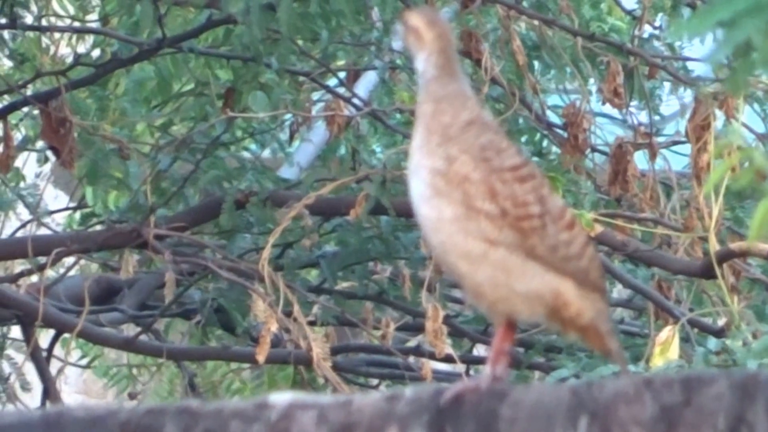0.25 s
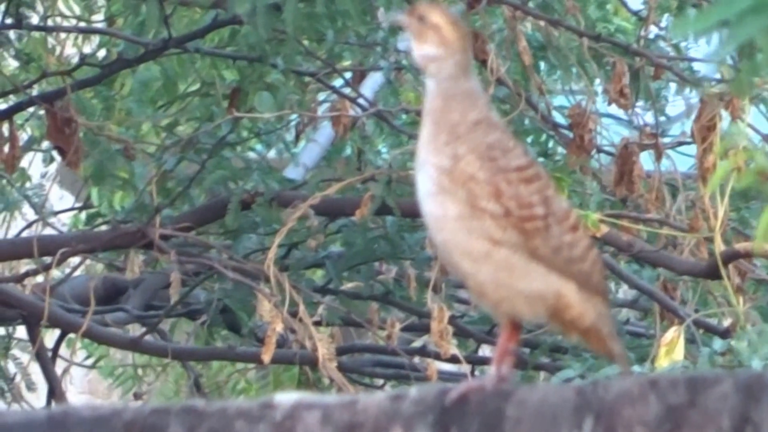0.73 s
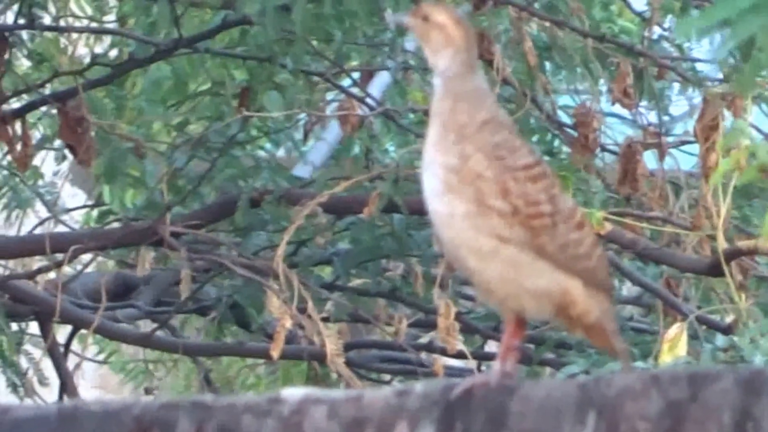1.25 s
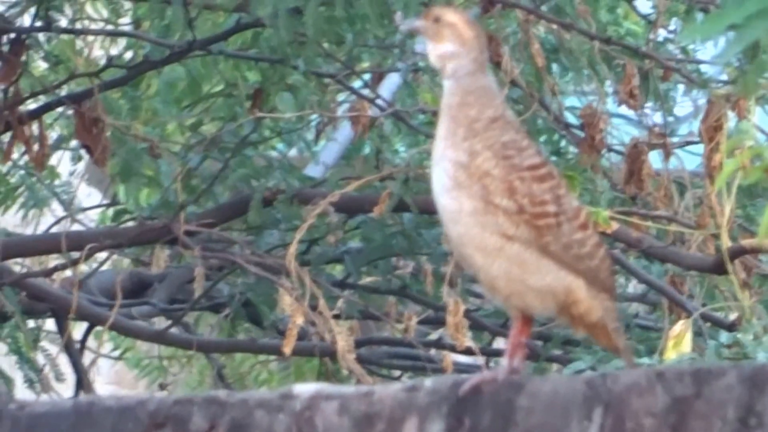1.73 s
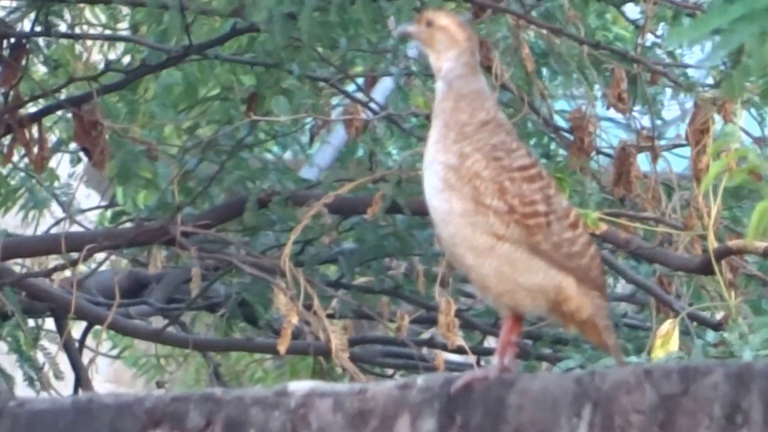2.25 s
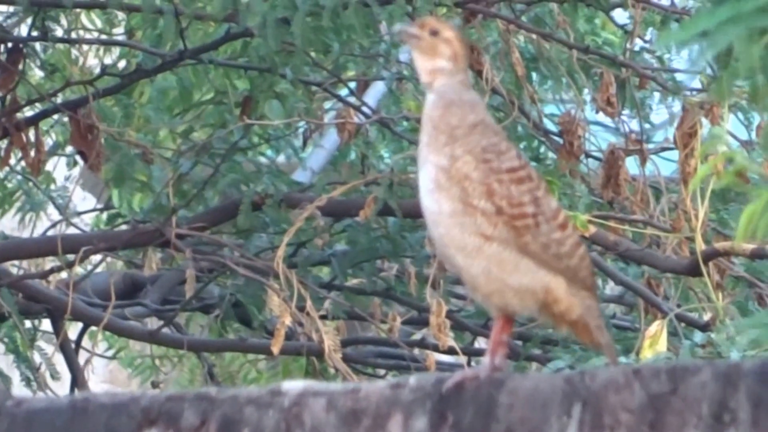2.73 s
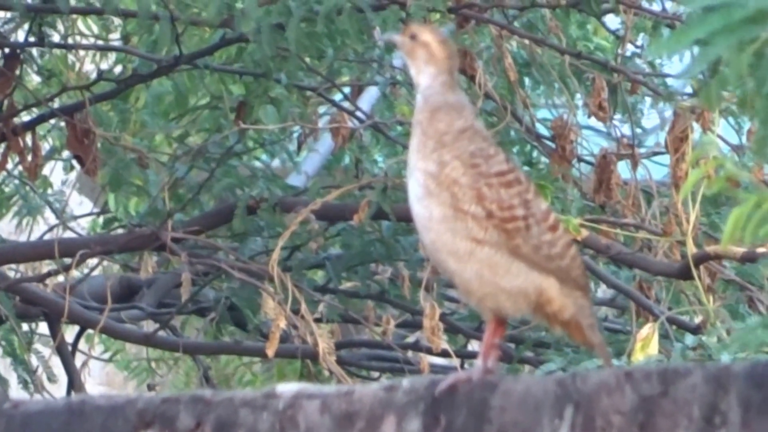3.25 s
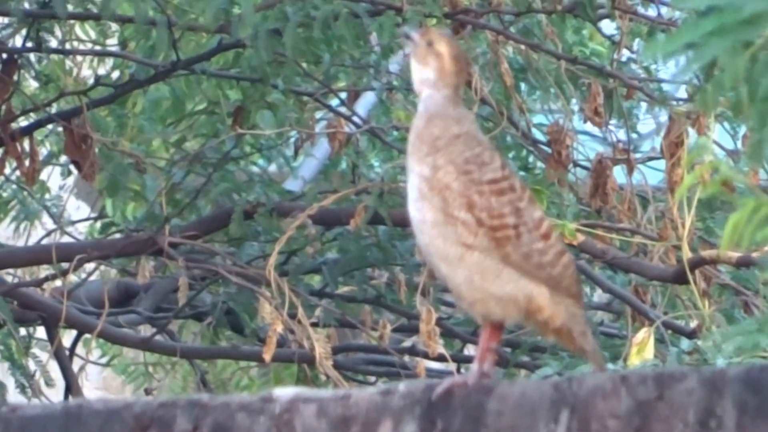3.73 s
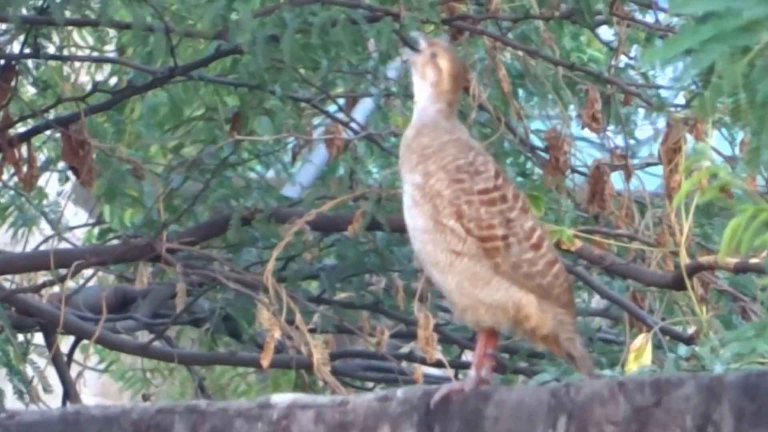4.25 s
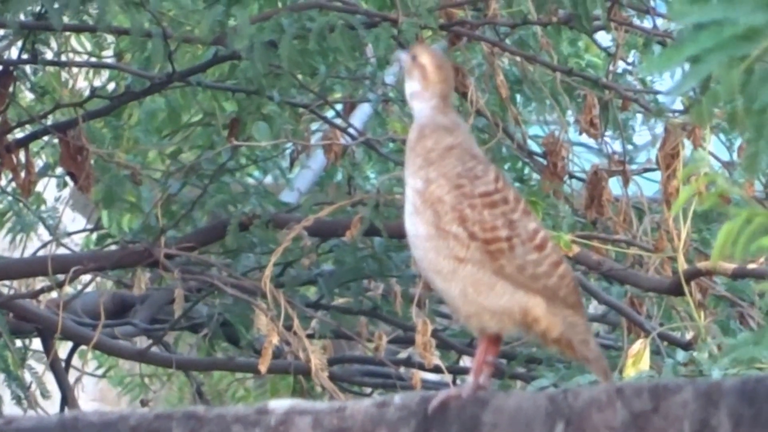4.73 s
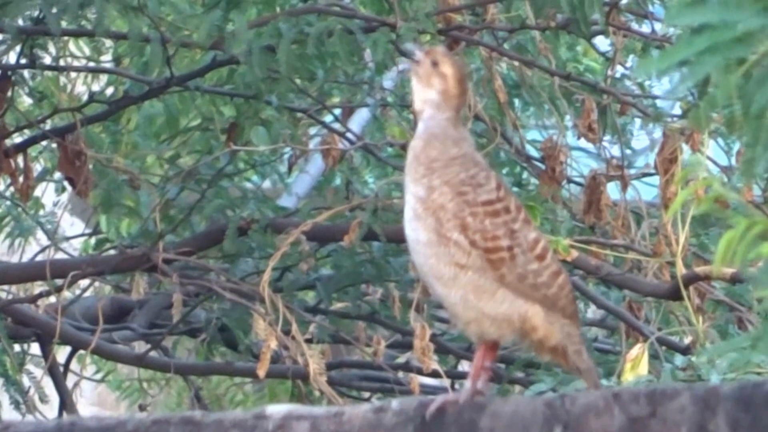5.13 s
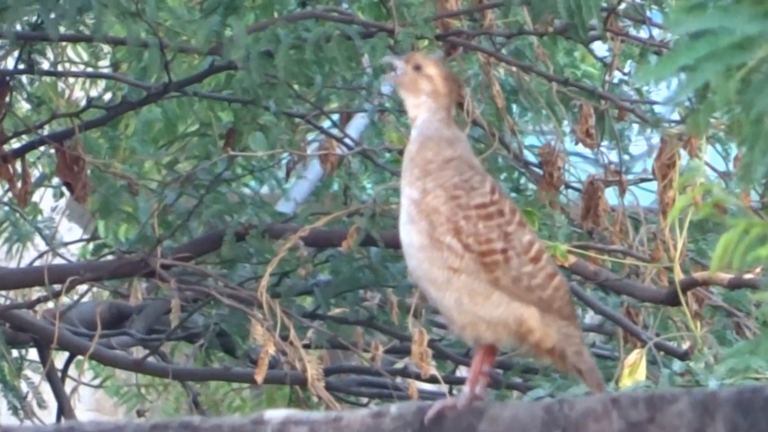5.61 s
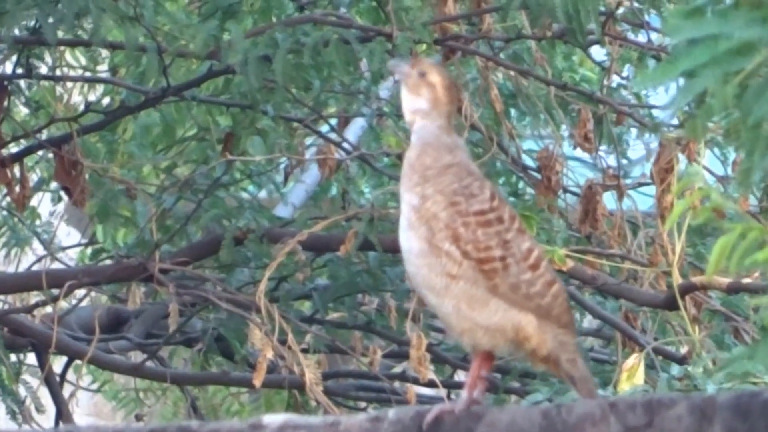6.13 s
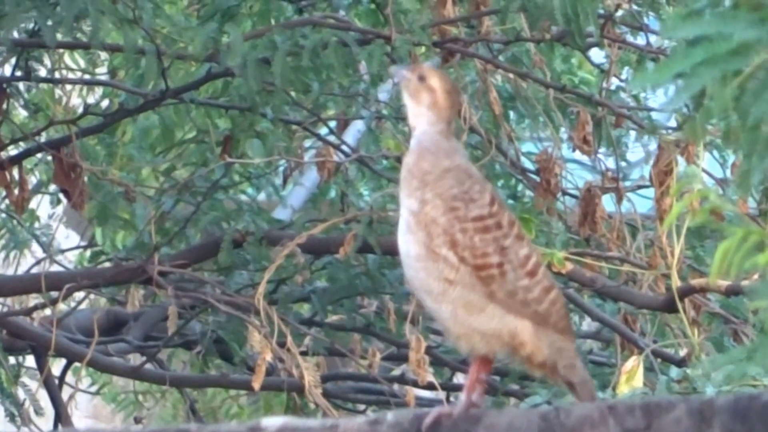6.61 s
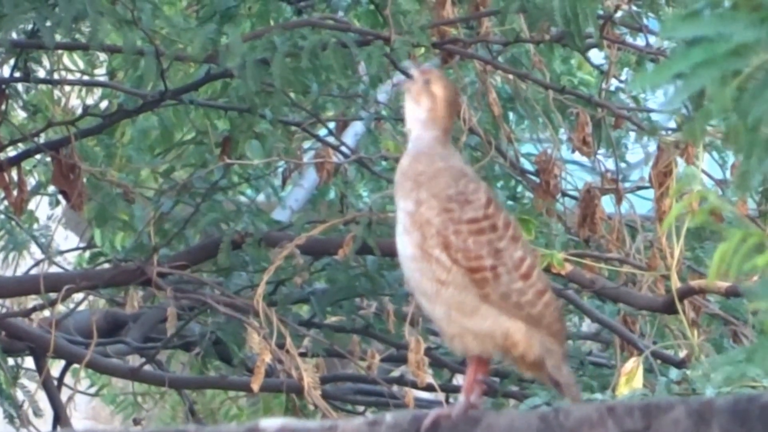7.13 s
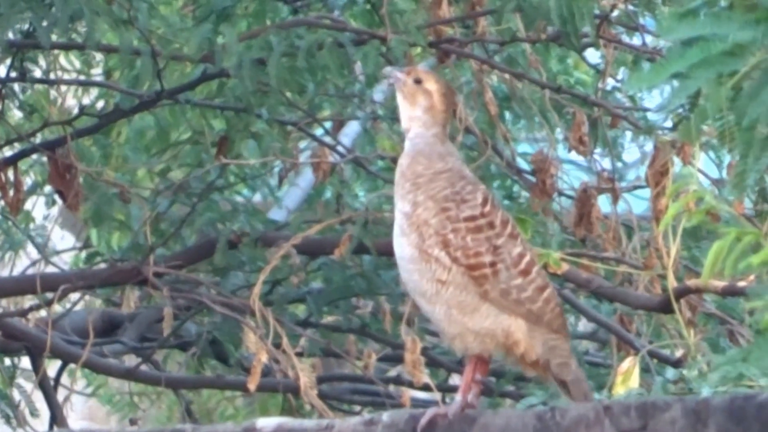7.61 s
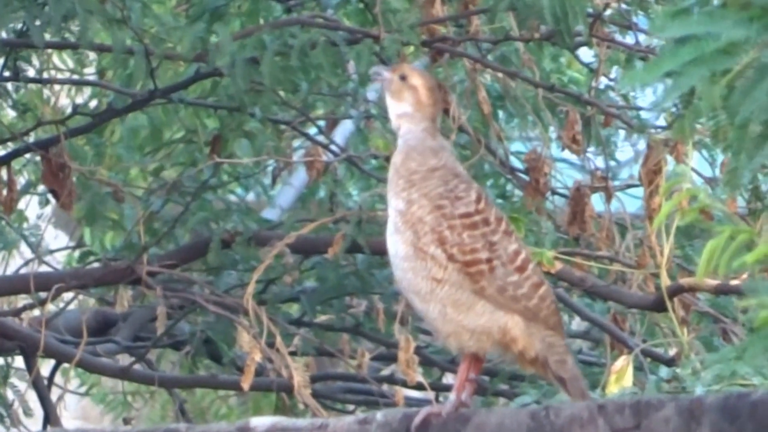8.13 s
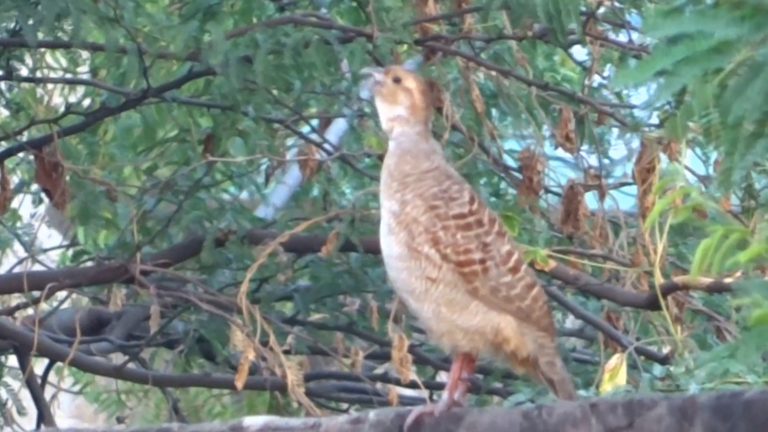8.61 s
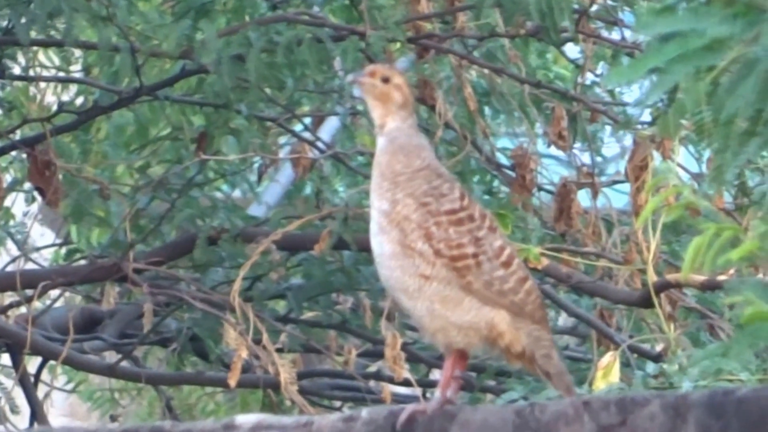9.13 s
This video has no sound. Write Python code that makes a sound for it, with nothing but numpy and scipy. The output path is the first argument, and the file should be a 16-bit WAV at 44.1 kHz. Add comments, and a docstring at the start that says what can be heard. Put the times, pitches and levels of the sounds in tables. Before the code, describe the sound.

Low town rumble and light airy hiss lie under a close francolin, heard slightly left of centre. Isolated squeals and clucks lead to soft nasal mews, then sharp, rough-edged double cries with falling ends, spaced at first and later about twice a second. Brief echoes and a leafy garden ring follow. Thin bird chips, a distant shrill trill and faint yaps appear behind; a motor swells late.

```python
"""The low rumble of a town comes first, then the squeals of a grey francolin close by on a garden wall. It
warms up with clucks while a second bird farther off answers in mews, then repeats a loud, piercing two-part
call from pulses and throat tones. The bird sits slightly left of centre; delayed copies and decaying noise make
the walls and trees answer. Small birds chip in thin sweeps; a trill and a yapping dog arrive from far off only
as garden scatter. A motor, an uneven low note over filtered noise, draws nearer towards the end."""
import sys
import numpy as np
from scipy import signal
from scipy.fft import rfft, irfft, next_fast_len
from scipy.io import wavfile
from scipy.ndimage import uniform_filter1d, minimum_filter1d

SR = 44100
rng = np.random.default_rng(int(sys.argv[2]) if len(sys.argv) > 2 else 0)


def unload_wav(signal):
    """Save mono or channel-first audio to the path in sys.argv[1] as 16-bit WAV at rate SR, clipped to [-1, 1]."""
    wavfile.write(
        sys.argv[1],
        SR,
        np.round(np.clip(np.atleast_2d(signal).T, -1, 1) * 32767).astype(np.int16),
    )


N = 412776
TIME = np.arange(N) / SR
CUTOFF_HZ = 15500  # top of the band at the microphone


def from_db(db):
    """Decibels to gain."""
    return 10 ** (np.asarray(db) / 20)


def rms_one(x):
    """Scale to unit power."""
    return x / np.sqrt(np.mean(x ** 2) + 1e-20)


def along(rows, t):
    """Every column of a curve, read at t."""
    s, *columns = np.transpose(rows)
    return [np.interp(t, s, c) for c in columns]


def at_hz(points, hz):
    """Read a spectrum on a log-frequency axis."""
    f, value = np.transpose(points)
    return np.interp(np.log(np.maximum(hz, 1)), np.log(f), value)


def colour(x, spectrum):
    """Filter by a spectrum in dB."""
    length = x.shape[-1]
    size = next_fast_len(length)
    gain = from_db(at_hz(spectrum, np.fft.rfftfreq(size, 1 / SR)))
    return irfft(rfft(x, size) * gain, size)[..., :length]


def wander(t, rate):
    """Random drift around zero: straight lines between normal draws, rate draws a second."""
    steps = (t - t[0]) * rate
    count = len(t) // 4
    return np.interp(steps, np.arange(count), rng.standard_normal(count))


def phase_of(hz):
    """Running phase of a moving pitch."""
    return 2 * np.pi * np.cumsum(hz) / SR


def glide(t, first, last, bend):
    """A pitch that moves from first to last; the higher the bend, the later it leaves."""
    return first + (last - first) * (t / t[-1]) ** bend


def fade(t, edge):
    """Soft start and stop, edge in seconds."""
    return np.clip(np.minimum(t - t[0], t[-1] - t) / edge, 0, 1)


def gate(t, start, stop, edge):
    """Attack, hold and release between two times."""
    return np.clip(np.minimum(t - start, stop - t) / edge, 0, 1)


def bump(t, centre, width):
    """A brief swell of height 1."""
    return np.exp(-((t - centre) / width) ** 2)


def add(track, s, sound):
    """Mix a sound in at time s."""
    i = max(int(s * SR), 0)
    track[i:i + len(sound)] += sound[:max(N - i, 0)]


# stereo width at the microphone: f/Hz, side against mid level/dB
WIDTH = [(30, -32), (90, -37), (180, -23), (350, -17.5), (700, -8), (2000, -10.5), (8000, -11),
         (14000, -21)]


def spread(mid, side):
    """Diffuse sound is alike in both channels in the bass and wider higher up."""
    return mid + colour(side, WIDTH) * np.array([[1], [-1]])


RUMBLE_DB, RUMBLE_RISE_DB_PER_S = -40, 0.28  # level at the start, then its growth
# far traffic: f/Hz, relative level/dB
RUMBLE = [(12, -41), (20, -16), (48, -3.5), (156, 0), (191, 2.5), (221, -2.5), (307, -1), (369, -2.5),
          (397, -2.5), (664, -8), (1090, -13.5), (1240, -13.5), (1430, -14), (1600, -21), (2080, -18),
          (3520, -120)]
# airy hiss: f/Hz, relative level/dB
AIR = [(900, -20), (1600, -9.5), (3000, 0), (4500, -4.5), (6000, -13), (10500, -16), (12500, -23),
       (16000, -34)]


def town(air_db=-48, hum_hz=96, hum_db=-47):
    """Far traffic that slowly grows, airy hiss and the unsteady hum of a machine."""
    rumble = spread(*rms_one(colour(rng.standard_normal((2, N)), RUMBLE)))
    air = spread(*rms_one(colour(rng.standard_normal((2, N)), AIR)))
    hum_phase = phase_of(hum_hz * (1 + 0.0434 * wander(TIME, 25)))
    hum = np.sin(hum_phase) * from_db(hum_db + 3.1 * wander(TIME, 8))
    rumble_gain = from_db(RUMBLE_DB + RUMBLE_RISE_DB_PER_S * TIME)
    return rumble_gain * rumble + from_db(air_db) * air + hum


# throat with the beak wide open: f/Hz, relative level/dB
THROAT = [(1000, -23), (1900, -16.5), (2500, -0.5), (3300, -1), (4400, -1), (5600, -9), (6800, -11),
          (9000, -11), (11500, -19.5), (15000, -25)]


def open_voice(t, hz, jitter, hiss_db):
    """A pulse-rich voice under the fixed resonance of the open throat; turbulence makes it hoarse."""
    k = np.arange(1, 17)[:, None]  # harmonic numbers
    gains = from_db(at_hz(THROAT, k * hz)) * (k * hz < CUTOFF_HZ)
    phase = phase_of(hz * (1 + jitter * wander(t, 1492)))
    power = (gains ** 2).sum(axis=0) / 2
    voice = (gains * np.cos(k * phase)).sum(axis=0) / np.sqrt(power)
    hiss = rms_one(colour(rng.standard_normal(len(t)), THROAT))
    return voice + from_db(hiss_db) * hiss


# squeals close by: t/s, length/s, pitch factor, level/dB before the register's own
SQUEALS = [(0.117, .12, .99, -21.5), (0.983, .13, 0.99, -24)]
# rising creak, whistle, drop: start and end as shares of the squeal,
# first f/Hz and last f/Hz before the pitch factor, bend of the glide, added level/dB
REGISTERS = [(0, 0.344, 655, 1741, 1.2, -0.5), (0.298, 0.531, 3454, 2950, 2.46, 3),
             (.49, 1, 2295, 1302, 2.4, -2)]


def squeals(edge=0.0014, swell_db=9, shake_db=2):
    """Loud cries that jump between registers; each register swells and fades."""
    out = np.zeros(N)
    for s, length, factor, db in SQUEALS:
        for start, end, first, last, bend, level_db in REGISTERS:
            t = np.arange(0, (end - start) * length, 1 / SR)
            voice = open_voice(t, factor * glide(t, first, last, bend), jitter=.024, hiss_db=-12)
            arch_db = swell_db * (np.sin(np.pi * t / t[-1]) - 1) + shake_db * wander(t, 282)
            cry = from_db(db + level_db + arch_db) * fade(t, edge) * voice
            add(out, s + start * length, cry)
    return out


def sweep(length, first, last, jitter, edge):
    """A thin tone sliding between two pitches."""
    t = np.arange(0, length, 1 / SR)
    hz = np.linspace(first, last, len(t)) * (1 + jitter * wander(t, 774))
    return fade(t, edge) * np.sqrt(2) * np.sin(phase_of(hz))


# chips of small birds: t/s, length/s, first f/Hz, last f/Hz, level/dB
CHIPS = [(0.555, 0.11, 4470, 4370, -51.5), (1.872, 0.085, 4220, 4210, -42.5),
         (4.066, 0.0088, 7440, 8300, -44), (4.101, .024, 9200, 14500, -43),
         (4.122, .044, 12900, 4580, -43.5), (4.68, 0.013, 7300, 8450, -47),
         (5.282, 0.032, 4660, 4670, -27.5), (6.252, .016, 6500, 10300, -42.5),
         (6.269, 0.024, 10200, 7500, -48), (6.27, 0.073, 4700, 3130, -37.5), (9.3, .02, 7250, 8300, -48.5)]


def chips(jitter=0.015):
    """Quick, thin sweeps of a nearly pure tone."""
    out = np.zeros(N)
    for s, length, first, last, db in CHIPS:
        add(out, s, from_db(db) * sweep(length, first, last, jitter, edge=0.0026))
    return out


# narrow throat resonances that pick out overtones of the clear voice:
# f/Hz, level/dB against the fundamental before each voice's overtone setting
OVERTONES = [(3200, -9.5), (4400, -9.5), (4750, -13.5), (4980, -9.5), (5400, -11.5), (6500, -15),
             (7400, -28), (8200, -21), (9450, -38), (9800, -20.5), (10200, -21), (11000, -31), (12300, -23),
             (14900, -30.5)]


def clear_voice(hz, overtone_db):
    """A nearly pure syrinx tone whose overtones flare as they cross the throat's resonances."""
    phase = phase_of(hz)
    upper = sum(from_db(at_hz(OVERTONES, k * hz)) * np.sin(k * phase) for k in range(2, 7))
    return np.sqrt(2) * (np.sin(phase) + from_db(overtone_db) * upper)


def rasp(t, pulse_hz, spectrum, jitter, hiss):
    """The membranes flap chaotically: uneven pulses and a little turbulence."""
    uneven_hz = pulse_hz * np.exp(jitter * wander(t, 700))
    cycles = np.floor(phase_of(uneven_hz) / (2 * np.pi))
    pulses = np.diff(cycles, prepend=0) + hiss * rng.standard_normal(len(t))
    return rms_one(colour(pulses, spectrum))


CLUCK_FALL, CLUCK_FALL_S = 0.69, .017  # end pitch over set pitch; time constant of the fall before the end
# the beak half closed over a cluck: f/Hz, relative level/dB
CLUCK_COLOUR = [(900, -28), (1500, -1), (2200, 6.5), (3300, -6), (4300, -11.5), (6500, -15), (8000, -29),
                (11000, -23.5), (15000, -38)]


def cluck(length, hz, db, rasp_db, overtone_db=-13, waver=0.018, scrape_tail_db=-12, tone_db=1):
    """A short scrape at half the pitch clears into a soft note that falls at its end."""
    t = np.arange(0, length, 1 / SR)
    u = t / t[-1]
    fall = 1 - (1 - CLUCK_FALL) * np.exp((t - length) / CLUCK_FALL_S)
    pitch = hz * fall * (1 + waver * wander(t, 700))
    swell = bump(u, 0.63, 0.21) * from_db(2 * wander(t, 378))
    flapping = rasp(t, pitch / 2, CLUCK_COLOUR, jitter=.09, hiss=.07)
    scrape = (bump(u, 0.25, .15) + from_db(scrape_tail_db)) * flapping
    note = from_db(db + tone_db) * swell * clear_voice(pitch, overtone_db)
    return fade(t, 0.0012) * (note + from_db(rasp_db) * scrape)


# a run relaxes toward the softest cluck; a stronger first cluck spaces its run wider
SOFT_CLUCK_HZ, SOFT_CLUCK_DB, SOFT_RASP_DB = 1792, -33, -35
CLUCK_EFFORT_KEPT = .33  # share of the effort left for the next cluck
CLUCK_GAP_S, CLUCK_GAP_S_PER_DB = .118, .001
# runs of clucks close by: t/s, clucks in the run, then for the first one
# length/s, f/Hz, tone level/dB before cluck's tone_db, rasp level/dB
CLUCKS = [(0.744, 1, .056, 1988, -21.5, -35.5), (1.743, 1, .066, 2024, -19.5, -31),
          (2.708, 2, 0.037, 1916, -34, -36), (3.806, 2, 0.041, 2043, -24.5, -27),
          (4.521, 3, .05, 2140, -21, -23.5), (5.218, 1, 0.042, 2154, -20, -24),
          (5.584, 2, 0.047, 2162, -18.5, -23.5), (6.184, 2, 0.044, 2128, -19.5, -23.5),
          (6.794, 2, .049, 2123, -19.5, -23.5), (7.426, 1, 0.046, 2285, -20, -21.5),
          (7.755, 1, 0.036, 1873, -33, -32), (8.108, 2, 0.049, 1900, -36, -28.5),
          (8.698, 2, 0.051, 1887, -37, -28.5)]


def clucks():
    """Runs of one to three clucks, the effort above the softest one draining from each to the next."""
    out, soft = np.zeros(N), np.array([SOFT_CLUCK_HZ, SOFT_CLUCK_DB, SOFT_RASP_DB])
    for s, count, length, hz, db, rasp_db in CLUCKS:
        effort = np.array([hz, db, rasp_db]) - soft
        gap = CLUCK_GAP_S + CLUCK_GAP_S_PER_DB * (db - SOFT_CLUCK_DB)
        for k in range(round(count)):
            add(out, s + k * gap, cluck(length, *(soft + effort * CLUCK_EFFORT_KEPT ** k)))
    return out


# far dog: t/s, length/s, f/Hz before the arch, level/dB before the scene's yap_db
YAPS = [(1.36, .16, 680, -52), (1.567, 0.23, 750, -51.5), (3.062, 0.1, 1124, -35),
        (4.061, 0.076, 1025, -33), (4.519, 0.057, 953, -36), (4.535, 0.11, 1376, -37),
        (5.259, 0.097, 1017, -36.5), (6.366, 0.11, 1058, -37.5), (6.386, 0.13, 1335, -36),
        (6.788, 0.085, 905, -32.5), (7.222, 0.071, 967, -33), (7.642, 0.13, 1030, -37.5),
        (7.676, 0.076, 1250, -38)]


def yaps(arch=.11, rough=0.073, octave_db=-11):
    """Hoarse arched yelps; little but the lowest partial carries this far."""
    out = np.zeros(N)
    for s, length, hz, db in YAPS:
        t = np.arange(0, length, 1 / SR)
        swell = np.sin(np.pi * t / length)
        phase = phase_of(hz * (1 + arch * (swell - .8) + rough * wander(t, 509)))
        voice = np.sqrt(2) * (np.sin(phase) + from_db(octave_db) * np.sin(2 * phase))
        add(out, s, from_db(db) * fade(t, 0.005) * voice)
    return out


MEW_WHISTLE_SHARE, MEW_DROOP = 0.52, .86  # share of the length; last pitch over first
MEW_DROP_FIRST, MEW_DROP_LAST, MEW_DROP_DB = .63, .42, -1.5  # pitches and level against the whistle


def mew(length, hz, jitter=0.031, hiss_db=-7, edge=0.01, shake_db=4):
    """A drooping whistle breaks to a lower register and drops away; both quaver."""
    t = np.arange(0, length * MEW_WHISTLE_SHARE, 1 / SR)
    droop = glide(t, hz, hz * MEW_DROOP, bend=3.14)
    whistle = fade(t, edge) * open_voice(t, droop, jitter, hiss_db)
    t = np.arange(0, length * (1 - MEW_WHISTLE_SHARE), 1 / SR)
    low = hz * glide(t, MEW_DROP_FIRST, MEW_DROP_LAST, bend=1.5)
    drop = fade(t, edge) * open_voice(t, low, jitter, hiss_db)
    cry = np.concatenate([whistle, from_db(MEW_DROP_DB) * drop])
    return cry * from_db(shake_db * (wander(np.arange(len(cry)) / SR, 250) - 0.32))


NEAREST_MEW_DB, MEW_DIRECT_LOSS = -25, 0.3  # fainter is farther: dB of direct sound lost per dB
MEW_TREBLE_LOSS = 0.48  # distance dulls too: dB lost at the top per dB of faintness
# hoarse mews, a whistle and a drop: t/s, length/s, whistle f/Hz, level/dB before distance and quaver
MEWS = [(1.583, .115, 3330, -30.5), (2.166, .13, 3590, -30), (2.365, .105, 3424, -30.5),
        (2.797, .11, 3350, -34.5), (3.069, 0.12, 3160, -35.5), (3.308, 0.15, 3870, -36),
        (3.844, 0.1, 3290, -37.5), (4.09, 0.12, 3500, -37)]


def mews():
    """Soft cries, duller than the squeals: what arrives directly, and what goes into the trees."""
    direct, sent = np.zeros(N), np.zeros(N)
    for s, length, hz, db in MEWS:
        far_db = db - NEAREST_MEW_DB  # negative: farther
        dulling_db = MEW_TREBLE_LOSS * far_db
        spectrum = [(3500, 1), (7000, dulling_db), (14000, -9.5 + dulling_db)]
        sound = from_db(db) * colour(mew(length, hz), spectrum)
        add(sent, s, sound)
        add(direct, s, sound * from_db(MEW_DIRECT_LOSS * far_db))
    return direct, sent


# every call: an opening rasp, a level note, a break, a second note that falls
OPENING_LEAD_S, OPENING_WIDTH_S, OPENING_DB = .023, .0055, -9.5
OPENING_HZ = 1350  # the opening rasp is half voiced, about an octave under the note
FIRST_NOTE_S, SECOND_NOTE_AT_S, NOTE_EDGE_S = .026, 0.0428, 0.0031
FALL_AT_S, FALL_BEND = .048, 1.15
SPENT_AT_S, SPENT_DB, SPENT_OVER_S = 0.071, -8, 0.0048  # the second note loses force
BREAK_RASP_DB, NOTE_RASP_DB = -18.5, -29.5
FLARE_DB, FLARE_S = -12, 0.0017  # the rasp flares wherever the tone catches or lets go
# a call that ends while still high cracks into a squeak
CRACK_ABOVE, CRACK_S, CRACK_FIRST_HZ, CRACK_LAST_HZ, CRACK_DB = .85, 0.0217, 6100, 5350, -28
# colour of the rasp: f/Hz, relative level/dB
RASP = [(1000, -32), (1600, -21), (2500, 0), (3300, 0), (4100, -8.5), (5200, -12.5), (6500, -10),
        (8000, -32), (11500, -18), (15000, -46)]
# loud calls close by: t/s of the first note, f/Hz, level/dB before drive_db, length/s,
# last pitch as a share of the first
CALLS = [(2.515, 2341, -18, 0.093, 0.76), (3.593, 2387, -16, .105, 0.77), (4.302, 2435, -16.5, .1, 0.76),
         (4.983, 2450, -14.5, .11, .78), (5.353, 2497, -13, .074, 0.88), (5.927, 2489, -13, 0.084, .88),
         (6.534, 2497, -13, 0.08, 0.87), (7.142, 2500, -13.5, .079, .88), (7.568, 2509, -15, 0.091, 0.7),
         (7.888, 2497, -14.5, 0.1, .72), (8.461, 2461, -14, .11, 0.73)]


def loud_calls(sag=.028, sag_width=.0065, jitter=0.0044, drive_db=2.5, second_db=-0.3, overtone_db=0,
               dulling_db=-10, dull_fall=0.04, shake_db=14, leak_db=-36, catch_db=3):
    """A rasp, a level note, a rough break, and a second note that falls and dulls as the pressure runs out."""
    out = np.zeros(N)
    for s, hz, db, length, last in CALLS:
        t = np.arange(-OPENING_LEAD_S - 2 * OPENING_WIDTH_S, length, 1 / SR)
        progress = np.clip((t - FALL_AT_S) / (length - FALL_AT_S), 0, 1)
        fall = (1 - last) * progress ** FALL_BEND
        pitch = hz * (1 - fall - sag * bump(t, FIRST_NOTE_S, sag_width) + jitter * wander(t, 395))

        first = gate(t, 0, FIRST_NOTE_S, NOTE_EDGE_S)
        second = gate(t, SECOND_NOTE_AT_S, length, NOTE_EDGE_S)
        spent_db = SPENT_DB * np.clip((t - SPENT_AT_S) / SPENT_OVER_S, 0, 1)
        second_gain = from_db(second_db + spent_db + shake_db * fall * wander(t, 500))
        force = first + second * second_gain + from_db(leak_db)
        dulled_db = dulling_db * np.minimum(fall / dull_fall, 1)
        tone = force * clear_voice(pitch, overtone_db + dulled_db + 2.6 * wander(t, 393))

        catch = from_db(catch_db) * bump(t, SECOND_NOTE_AT_S + FLARE_S, FLARE_S)
        flares = bump(t, 0, FLARE_S) + bump(t, FIRST_NOTE_S, FLARE_S) + catch
        between = (1 - first) * gate(t, t[0], SECOND_NOTE_AT_S, OPENING_WIDTH_S)
        hoarse = from_db(FLARE_DB) * flares + from_db(BREAK_RASP_DB) * between + from_db(NOTE_RASP_DB)
        flapping = rasp(t, pitch / 3, RASP, jitter=.13, hiss=.06)

        opening_gain = from_db(OPENING_DB) * bump(t, -OPENING_LEAD_S, OPENING_WIDTH_S)
        opening = opening_gain * rasp(t, OPENING_HZ, RASP, jitter=.04, hiss=0.046)
        call = from_db(db + drive_db) * fade(t, .0012) * (opening + tone + hoarse * flapping)
        add(out, s + t[0], call)
        if last > CRACK_ABOVE:
            squeak = sweep(CRACK_S, CRACK_FIRST_HZ, CRACK_LAST_HZ, jitter=0.0091, edge=0.0039)
            add(out, s + length - NOTE_EDGE_S, from_db(CRACK_DB) * squeak)
    return out


TRILL_HZ, TRILL_SAG_HZ_PER_S, TRILL_SWELL_DB_PER_S, TRILL_EDGE_S = 4860, 200, 8.5, .12
# phrases of a far bird: t/s, length/s, level/dB at the end before the edge fade and the scene's trill_db
TRILL = [(3.099, 0.91, -37), (4.048, 0.68, -31.5), (4.952, 0.82, -32)]


def trill(waver=.026, octave_db=-21, flutter_db=3):
    """A shrill, fluttering tone with a faint octave; each phrase swells in level and sags in pitch."""
    out = np.zeros(N)
    for s, length, db in TRILL:
        t = np.arange(0, length, 1 / SR)
        phase = phase_of((TRILL_HZ - TRILL_SAG_HZ_PER_S * t) * (1 + waver * wander(t, 120)))
        level_db = db + TRILL_SWELL_DB_PER_S * (t - length) + flutter_db * wander(t, 28.8)
        tone = np.sin(phase) + from_db(octave_db) * np.sin(2 * phase)
        add(out, s, from_db(level_db) * fade(t, TRILL_EDGE_S) * tone)
    return out


# thin whistles close by that lead into a call: t/s, length/s, f/Hz, level/dB before the partials' own
WHISTLES = [(3.444, 0.16, 2770, -44.5), (5.204, 0.17, 2680, -39), (5.814, 0.17, 2704, -35.5),
            (6.428, 0.11, 2705, -30.5), (7.036, 0.12, 2710, -30), (7.675, 0.095, 2722, -28),
            (8.347, 0.084, 2722, -29.5)]


def whistles():
    """The syrinx sings thinly while pressure builds for a call."""
    partials_db = [4.5, -6.0, -15, -20, -27]
    out = np.zeros(N)
    for s, length, hz, db in WHISTLES:
        t = np.arange(0, length, 1 / SR)
        phase = phase_of(hz * (1 + 0.0045 * wander(t, 92)))
        sound = sum(from_db(level) * np.sin(k * phase) for k, level in enumerate(partials_db, 1))
        add(out, s, from_db(db) * fade(t, 0.022) * sound)
    return out


# motor drawing nearer, barely there at first: t/s, firing f/Hz, level/dB
MOTOR = [(0, 130.6, -72), (6.5, 135.5, -47.5), (8.3, 144, -38.5), (8.72, 145, -37), (9.0, 185.6, -36),
         (9.36, 185.4, -35)]


def motor(rough=0.048, throb_db=3, roar_db=-4):
    """An uneven exhaust note over a dull roar."""
    hz, db = along(MOTOR, TIME)
    phase = phase_of(hz * (1 + rough * wander(TIME, 60)))
    note = (np.sin(phase) + 0.097 * np.sin(2 * phase)) * from_db(throb_db * wander(TIME, 30))
    dull = [(60, -19), (150, -3.0), (300, -11.0), (600, -12.5), (1500, -19.0), (5000, -44)]  # Hz, dB
    roar = rms_one(colour(rng.standard_normal(N), dull))
    return from_db(db) * (note + from_db(roar_db) * roar)


# walls whose echoes travel about 6, 18 and 32 m farther than the direct sound: delay t/s, level/dB
ECHOES = [(0.0175, -15.5), (.053, -14), (.092, -22.5)]


def wall_echoes(notes):
    """Each wall returns one later, weaker copy."""
    return sum(from_db(db) * np.interp(TIME - delay, TIME, notes, left=0) for delay, db in ECHOES)


# the beak aims its treble at the trees, so the scatter is brighter than the direct sound: f/Hz, level/dB
AIM = [(1500, 3), (2400, 0.5), (3300, 5), (5000, 3), (7000, 9), (11000, 5)]


def toward_trees(notes):
    """The brighter sound that the beak sends into the trees."""
    return colour(notes, AIM)


# ringing of the garden: f/Hz, t60/s
GARDEN_T60 = [(500, 1.0), (2300, 1), (5000, 0.79), (10000, 0.52), (15000, 0.62)]


def garden(x):
    """Dense scatter from walls and leaves, as noise bands dying at their own rates."""
    t = np.arange(SR) / SR
    edges = np.geomspace(400, 16000, 8)  # band limits, Hz
    tail = 0
    for low, high in zip(edges, edges[1:]):
        band_pass = signal.butter(2, [low, high], "band", fs=SR, output="sos")
        band = signal.sosfilt(band_pass, rng.standard_normal((2, SR)))
        tail = tail + band * from_db(-60 * t / at_hz(GARDEN_T60, np.sqrt(low * high)))
    tail = tail * np.clip(t / 0.0013, 0, 1) / np.sqrt(SR / 20)
    return spread(*signal.fftconvolve(x[None], tail, axes=1)[:, :N])


def scene(wet_db=-9, cry_wet_db=-6, mew_wet_db=-3, yap_db=1, trill_db=-2):
    """The near bird with its echoes; the far dog and trill arrive only as scatter."""
    notes = loud_calls() + whistles() + clucks() + chips()
    squeal = squeals()
    mew_direct, mew_sent = mews()
    far = from_db(yap_db) * yaps() + from_db(trill_db) * trill()
    cries_sent = from_db(cry_wet_db) * squeal + from_db(mew_wet_db) * mew_sent
    scatter = garden(from_db(wet_db) * toward_trees(notes) + cries_sent + far)
    slightly_left = from_db([[.4], [-.4]])
    near = (notes + squeal + mew_direct + wall_echoes(notes)) * slightly_left
    return near + scatter + town() + motor()


def record(dry, release_db_per_s=300):
    """A fast limiter flattens the loudest notes; the top is cut steeply."""
    ceiling_db = -6.8
    peak_db = 20 * np.log10(np.abs(dry).max(axis=0) + 1e-9)
    over = np.maximum(peak_db - ceiling_db, 0)
    release = release_db_per_s * TIME
    held = np.maximum.accumulate(over + release) - release  # jumps up at once, lets go steadily
    gain_db = uniform_filter1d(minimum_filter1d(-held, size=64), size=64)
    steep_cut = signal.ellip(10, .1, 80, CUTOFF_HZ, fs=SR, output="sos")
    return signal.sosfilt(steep_cut, dry * from_db(gain_db))


dry = scene()
out = record(dry)
unload_wav(out)
```